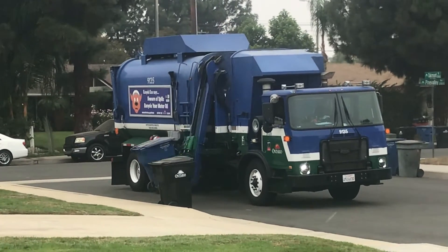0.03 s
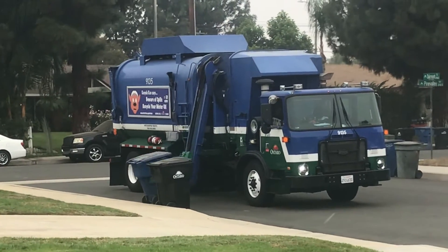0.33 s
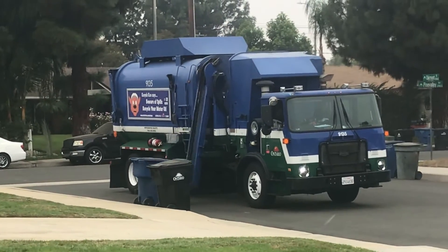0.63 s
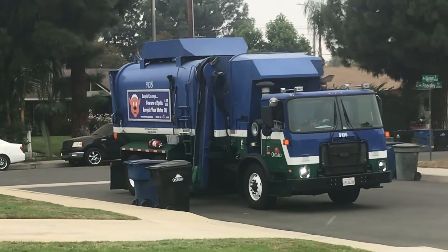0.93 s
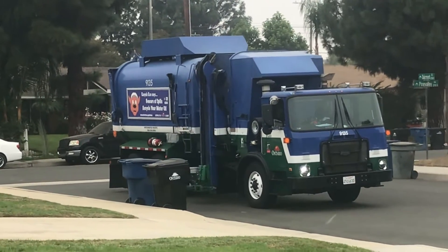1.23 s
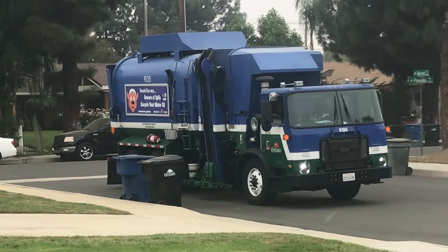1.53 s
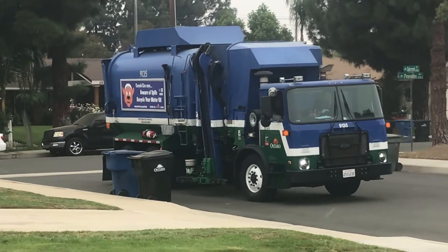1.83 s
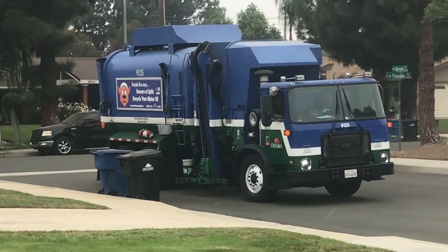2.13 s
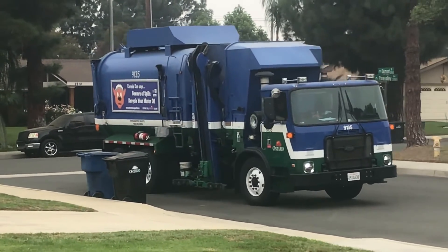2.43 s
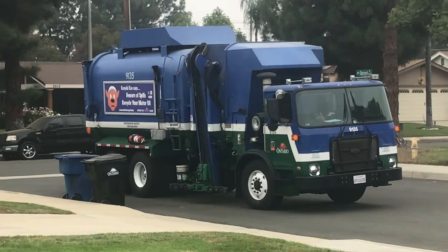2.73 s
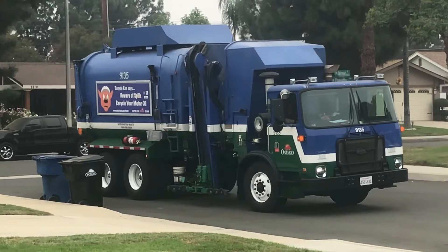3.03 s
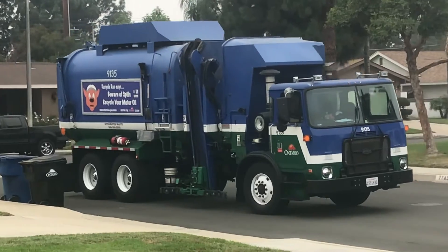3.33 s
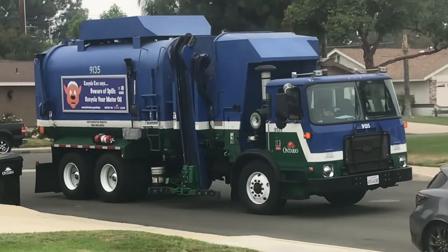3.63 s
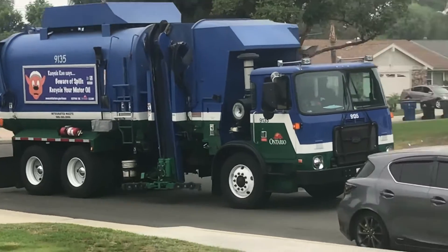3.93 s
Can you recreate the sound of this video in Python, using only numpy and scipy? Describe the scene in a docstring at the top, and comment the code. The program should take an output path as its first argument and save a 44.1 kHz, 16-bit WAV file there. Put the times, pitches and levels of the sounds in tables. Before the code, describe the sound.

A garbage truck's diesel engine rumbles under hissing hydraulics, plastic bin thumps and rattling metal clanks that echo slightly off houses. After a brief squeak, the engine grows louder and higher as the truck drives off with a faint whine.

```python
"""A diesel refuse truck idles in a suburban street, then revs up and pulls away. Periodic firing
drives the exhaust tones and roar and knocks on the engine block; gears whine, a turbo whistles.
Before it leaves, turbulent oil hisses in the hydraulic valves as the arm sets a hollow plastic bin
down with a few thumps. Impacts excite the modes of the steel arm, which clanks back and rattles
into its rest. The house fronts reflect the hard sounds."""
import sys
import numpy as np
from scipy import signal
from scipy.fft import rfft, irfft, next_fast_len
from scipy.io import wavfile
from scipy.ndimage import map_coordinates

SR = 44100
rng = np.random.default_rng(int(sys.argv[2]) if len(sys.argv) > 2 else 0)


def transcribe(signal):
    """Save signal, clipped to [-1, 1], as a 16-bit WAV file at the path in sys.argv[1]."""
    frames = np.atleast_2d(signal).T
    limited = np.clip(frames, -1, 1)
    pcm = np.round(limited * 32767).astype(np.int16)
    wavfile.write(sys.argv[1], SR, pcm)


N = 176400
T = np.arange(N) / SR

# Engine speed. Each row: time in seconds, firings per second.
FIRING_RATE = [(0, 34.6), (.294, 36.3), (.648, 41.6), (.93, 34), (1.1, 41), (1.2, 43.8), (1.46, 55),
               (1.83, 59), (2.05, 59), (2.18, 70), (2.28, 73.4), (2.38, 71.7), (2.59, 83.4), (3.05, 95),
               (3.47, 100.3), (3.77, 103.3), (4, 103)]
# Cylinders in firing order. Each entry: relative strength in dB.
CYLINDER_DB = [-2, -1.2, -1.2, -4, -1.2, 1.7]
# Exhaust tones at the firing rate and at twice that rate. Each row: time in seconds, level in dB.
FIRST_ORDER_LEVEL = [(0, -55), (1.05, -53), (1.2, -34), (1.23, -53), (1.28, -32.5), (1.43, -37.5),
                     (1.58, -32.5), (1.92, -32), (2.27, -26), (2.33, -36.5), (2.41, -22.5), (2.5, -31.5),
                     (2.55, -20.5), (2.62, -16), (2.74, -26.5), (2.77, -41), (2.83, -25), (3.93, -32.5),
                     (4, -29)]
SECOND_ORDER_LEVEL = [(0, -35), (.25, -38), (.38, -42), (.6, -37), (.8, -36), (.92, -42), (.99, -28.5),
                      (1.17, -28), (1.21, -41), (2.2, -46), (4, -43)]
# Weak exhaust tones. Each row: multiple of the firing rate, level in dB relative to the roar.
HALF_ORDERS = [(.5, -18), (1.5, -11.5), (2.5, -12.5), (3.5, -15.5), (4.5, -16)]
# Gear tones. Each row: multiple of the firing rate, level in dB relative to the knock.
GEAR_ORDERS = [(11.3, -9.5), (14.6, -16.5), (23.5, -20.5)]
# Turbo whistle. Each row: time in seconds, frequency in Hz, level in dB.
TURBO_WHISTLE = [(2.53, 10705, -70), (2.708, 11460, -60.5), (3.086, 12040, -60.5), (3.9, 11900, -63)]
# Envelopes of exhaust roar, combustion knock, fan and intake rush, high sizzle and valve hiss.
# Each row: time in seconds, level in dB.
ROAR_LEVEL = [(0, -46), (1.0, -42), (1.4, -39.5), (2.0, -37), (3.3, -29), (4.0, -30)]
KNOCK_LEVEL = [(0, -40.5), (.4, -45.5), (1.0, -43), (1.35, -44), (1.7, -41.5), (2.0, -39.3), (2.78, -31.5),
               (4.0, -28)]
RUSH_LEVEL = [(0, -62), (1.4, -50.5), (2.05, -38.5), (2.206, -43), (2.95, -36.5), (3.624, -34)]
SIZZLE_LEVEL = [(.6, -73), (1.0, -57), (1.4, -53.5), (1.7, -42), (2.1, -48.5), (2.5, -47), (2.9, -59)]
VALVE_LEVEL = [(0, -34.5), (.1, -36.5), (.4, -36.5), (.52, -37.5), (.66, -36), (.9, -35), (1.0, -41),
               (1.15, -42.5), (1.25, -51), (1.45, -56), (1.55, -37), (1.67, -37.5), (1.82, -32), (2.0, -45),
               (2.3, -81.5)]
# Spectral shapes of those noises and of the arm's crash. Each row: frequency in Hz, relative gain in dB.
ROAR_SPECTRUM = [(25, -30), (50, -6.5), (90, 8.5), (125, -1), (160, 3), (215, -6.5), (280, 0), (340, -3.5),
                 (400, -12.5), (460, -8), (750, -11), (2000, -51), (12000, -51)]
KNOCK_SPECTRUM = [(200, -26), (450, -5.5), (900, -2), (2400, -4), (4000, 7.5), (8000, -28), (12000, -46)]
RUSH_SPECTRUM = [(500, -3), (1500, -2), (2500, -8.5), (3300, -2.5), (4400, -3.5), (5700, -2.5),
                 (6500, -7.5), (7300, -17), (9300, -26), (10400, -36), (11300, -28), (12300, -35),
                 (13700, -78), (15500, -64)]
SIZZLE_SPECTRUM = [(3500, -38), (5000, 5), (5450, 7), (6100, 0.5), (6800, 5), (7300, -2.5), (7600, -15),
                   (8600, -11), (10300, -25), (11500, -24), (13500, -31)]
VALVE_SPECTRUM = [(200, -8.5), (480, -7), (800, 0.5), (1700, 2.5), (2850, -1.5), (3300, 4), (4000, 1),
                  (5700, 1), (7200, -13), (9500, -29), (10400, -32), (11500, -27), (14000, -37)]
CRASH_SPECTRUM = [(150, 5.5), (330, 2.5), (470, -5), (650, 6.5), (1000, -1.5), (1350, -3), (1700, -0.5),
                  (2900, 1), (3600, 2), (4800, -0.5), (5500, 0), (6400, -5), (7500, -16), (10300, -31.5),
                  (11500, -43), (14000, -58)]
# Resonances of the engine block, and of the arm's frame under oil flow.
# Each row: frequency in Hz, bandwidth in Hz, relative gain in dB.
BLOCK_RESONANCES = [(428, 58, -13), (612, 69, 0.5), (723, 111, -1.5), (1086, 111, 0.5), (1243, 150, -6),
                    (1475, 140, -8.5), (1795, 80, -5.5), (2170, 290, -12.5)]
FLOW_RESONANCES = [(622, 97, -4), (999, 49, -4.5), (1501, 18, -1.5), (1690, 35, -4.5), (2293, 53, -15)]
# Blows on the steel arm. Each row: start in seconds, level in dB, T60 of the crash in seconds,
# ring level in dB relative to the crash, frequency of the struck part in Hz.
ARM_BLOWS = [(.02, -42, .1, 11, 1015), (.553, -28.5, .18, -2, 1875), (.692, -20.5, 0.1, -0.5, 587),
             (.709, -26, 0.2, -4, 1070), (.727, -32.5, 0.72, 5.5, 1538), (.823, -21.5, 0.18, -2, 1530),
             (.837, -32, 0.25, 8, 1010), (.905, -32.5, 0.22, -2, 2260), (.996, -42, 0.16, 9.5, 1000),
             (1.104, -30, 0.081, -6.5, 907), (1.541, -28, 0.13, -13, 2580), (1.556, -38, 0.097, 10, 742),
             (1.584, -22.5, 0.12, -10, 2010), (1.623, -25, 0.078, -5.5, 5620), (1.692, -29, 0.57, -6, 3050),
             (1.724, -29.5, 0.46, 1, 811), (1.737, -38.5, .1, 12.5, 758), (1.764, -17, 0.097, -8.5, 724.5),
             (1.785, -40, .27, 11, 5530), (1.89, -32, .22, 0.5, 1510)]
# Bumps of the bin on the road. Each row: start in seconds, thump level in dB, thump frequency in Hz,
# level of the walls' ring in dB.
BIN_BUMPS = [(.421, -22.5, 112, -22.5), (.446, -28, 158, -23), (.554, -22, 93, -35), (0.626, -19, 86, -40),
             (0.831, -30, 312, -28)]
# Modes of the steel frame and bin walls. Each row: frequency in Hz, relative level in dB, T60 in seconds.
FRAME_MODES = [(316.6, -7.5, 0.13), (551, -7, 0.27), (590, 1.5, 0.15), (717.5, 1, 0.19), (922, -2.5, 0.19),
               (1036.5, 8.5, 0.07), (1230, -9, .29), (1541, 2.5, 0.11), (1742, -4.5, 0.27),
               (2070, -5, 0.21), (2290, 1, 0.15), (3320, -2, 0.1), (3970, -7, 0.13), (5350, -1, .45),
               (5760, -11, 0.22)]
BIN_MODES = [(161, -11, 0.075), (272, -3.5, 0.09), (615, 4, 0.082), (682, -2, 0.099), (946, -6, 0.14),
             (1457, -14, 0.17), (1740, -4, 0.1)]


def exhaust(firing_hz, cycle):
    """Periodic gas pulses give engine orders and a puffing roar; order 3 swells at a pipe resonance."""
    pipe_hz, half_width_hz, pipe_db = 293.3, 20.6, -3.5
    first = amp(curve(FIRST_ORDER_LEVEL)) * order_tone(cycle, order=1, rough=0.027)
    second = amp(curve(SECOND_ORDER_LEVEL)) * order_tone(cycle, order=2, rough=0.2)
    pipe_gain = amp(pipe_db) / np.hypot(1, (3 * firing_hz - pipe_hz) / half_width_hz)
    third = pipe_gain * order_tone(cycle, order=3, rough=0.25)
    halves = sum(amp(db) * order_tone(cycle, order, rough=0.94) for order, db in HALF_ORDERS)
    puffs = coloured(noise() * firing_gate(cycle, decay_periods=0.4, bed=0.92), ROAR_SPECTRUM)
    return first + second + amp(curve(ROAR_LEVEL)) * (third + halves + puffs)


def knock(cycle):
    """Impulsive excitation: each cylinder repeats its own rap on the resonant block, over random clatter."""
    rap_t60, raps_db = 0.03, -7
    firings = np.flatnonzero(np.diff(cycle.astype(int)))
    raps, t = np.zeros(N), T[:SR // 20]
    for k, db in enumerate(CYLINDER_DB):
        impulses = amp(db) * np.bincount(firings[k::len(CYLINDER_DB)], minlength=N)
        rap = rng.standard_normal(len(t)) * np.exp(-np.log(1000) * t / rap_t60)
        raps += signal.fftconvolve(impulses, rap)[:N]
    clatter = noise() * firing_gate(cycle, decay_periods=0.7, bed=0.78)
    block = resonate(clatter + amp(raps_db) * unit(raps), BLOCK_RESONANCES)
    return amp(curve(KNOCK_LEVEL) + 0.57 * wobble(14)) * coloured(block, KNOCK_SPECTRUM)


def steel_arm():
    """Each impact gives a crash of loose links and excites frame modes, most near the struck part's pitch."""
    fall_db_per_octave, part_t60 = 2, 0.12
    crash_power, ring = np.zeros(N), np.zeros(N)
    for start, db, t60, ring_db, part_hz in ARM_BLOWS:
        crash_power += (amp(db) * blow(start, attack=0.0022, t60=t60)) ** 2
        frame_modes = [(hz, level - fall_db_per_octave * abs(np.log2(hz / part_hz)), mode_t60)
                       for hz, level, mode_t60 in FRAME_MODES]
        part_modes = [(part_hz, 0, part_t60), (1.22 * part_hz, -9.5, part_t60)]
        clonk = strike(start, part_modes, attack=0.0025)
        ring += amp(db + ring_db) * (strike(start, frame_modes, attack=0.0049) + clonk)
    chatter = unit(amp(0.5 * wobble(270)))
    return np.sqrt(crash_power) * coloured(noise() * chatter, CRASH_SPECTRUM) + ring


def plastic_bin():
    """Damped oscillation: at each bump the air in the empty bin thumps and its soft walls ring."""
    rise_s = 0.0097
    out = np.zeros(N)
    for start, db, hz, wall_db in BIN_BUMPS:
        age = np.maximum(T - start, 0) / rise_s
        thump = amp(db) * age * np.exp(1 - age) * np.sin(2 * np.pi * hz * (T - start))
        out += thump + amp(wall_db) * strike(start, BIN_MODES, attack=0.0024)
    return out


def hydraulics():
    """Turbulent oil hisses in the valves and drives frame resonances; ticking links modulate both."""
    tick_hz, tick_db, decay_periods, ring_db = 26, -4, 0.16, -4
    ring = resonate(noise() * amp(3.1 * wobble(150)), FLOW_RESONANCES)
    tick_count = np.cumsum(tick_hz * amp(3.5 * wobble(tick_hz))) / SR  # unevenly spaced
    ticks = unit(1 + amp(tick_db) * np.exp(-(tick_count % 1) / decay_periods))
    hiss = coloured(noise(), VALVE_SPECTRUM)
    return amp(curve(VALVE_LEVEL)) * ticks * (hiss + amp(ring_db) * ring)


def gears(cycle):
    """Meshing teeth whine at constant multiples of the engine speed, fading in as the truck pulls away."""
    start_s, rise_s = 2.5, 0.79
    load = amp(curve(KNOCK_LEVEL)) * np.clip((T - start_s) / rise_s, 0, 1)
    return load * sum(amp(db) * order_tone(cycle, order, rough=0.5) for order, db in GEAR_ORDERS)


def fan_and_intake(cycle):
    """Turbulent air gives a broadband rush, weakly pulsed by the firing; a thin sizzle lies above it."""
    flow = noise() * firing_gate(cycle, decay_periods=0.3, bed=8.4)
    rush = amp(curve(RUSH_LEVEL)) * coloured(flow, RUSH_SPECTRUM)
    sizzle = amp(curve(SIZZLE_LEVEL)) * coloured(noise(), SIZZLE_SPECTRUM)
    return rush + sizzle


def turbo():
    """The spinning turbo whistles; random modulation and a noise band just below make the tone breathy."""
    jitter_hz, spread_hz, breath_db, fade_s = 70, 360, -5, 0.11
    phase = 2 * np.pi * np.cumsum(curve(TURBO_WHISTLE) + jitter_hz * wobble(500)) / SR
    breath = unit(wobble(2 * spread_hz) * np.sin(phase - 2 * np.pi * spread_hz * T + wobble(300)))
    tone = amp(1.795 * wobble(60)) * np.sin(phase + 0.9 * wobble(350))
    fade_in = np.clip((T - TURBO_WHISTLE[0][0]) / fade_s + 1, 0, 1)
    return fade_in * amp(curve(TURBO_WHISTLE, column=2)) * (tone + amp(breath_db) * breath)


def squeak():
    """A short falling glide, roughened by phase modulation, sounds as the truck starts to roll."""
    start_s, length_s, top_hz, fall_hz, level_db = 2.075, 0.07, 6850, 1550, -44
    progress = np.clip((T - start_s) / length_s, 0, 1)
    phase = 2 * np.pi * np.cumsum(top_hz - fall_hz * progress) / SR
    envelope = np.sqrt(abs(np.sin(np.pi * progress)))
    return amp(level_db) * envelope * np.sin(phase + 1.22 * wobble(560))


def street(x):
    """Reflection from the house fronts: convolution with a delayed, decaying tail of noise."""
    tail = coloured(noise(), [(100, -3), (400, -6.5), (5000, -22.5), (12000, -4.5)])
    tail *= blow(start=0.033, attack=0.0046, t60=0.29)
    return signal.fftconvolve(x, tail / np.linalg.norm(tail))[:N]


def firing_gate(cycle, decay_periods, bed):
    """Amplitude modulation: a burst per firing, at its cylinder's strength, over a steady bed."""
    strength = amp(np.array(CYLINDER_DB)[cycle.astype(int) % len(CYLINDER_DB)])
    return unit(bed + strength * np.exp(-(cycle % 1) / decay_periods))


def order_tone(cycle, order, rough):
    """An engine order: a sinusoid at a multiple of the firing rate, unsteady in level and phase."""
    return np.sqrt(2) * (1 + rough * wobble(35)) * np.sin(2 * np.pi * order * cycle + rough * wobble(25))


def strike(start, modes, attack):
    """Modal superposition: damped sinusoids ring from one blow and jangle as their phases wander."""
    scatter_db, jangle_rad, steps_per_s = 2.14, 0.68, 108
    t, out = T[:SR // 2], np.zeros(N + SR)
    hz, db, t60 = np.transpose(modes)[:, :, None]
    size = amp(db + scatter_db * rng.standard_normal(hz.shape))
    walks = np.cumsum(rng.standard_normal((len(hz), 400)), axis=1)
    wander = np.array([map_coordinates(walk, [t * steps_per_s], mode="nearest") for walk in walks])
    drift = jangle_rad * np.sqrt(hz / 1000) * wander  # higher modes drift further
    envelopes = size / np.linalg.norm(size) * np.exp(-np.log(1000) * t / t60)
    ring = (envelopes * np.sin(2 * np.pi * hz * t + drift)).sum(0)
    out[round(start * SR):][:len(t)] = np.sqrt(2) * ring * (1 - np.exp(-t / attack))
    return out[:N]


def blow(start, attack, t60):
    """Exponential rise and decay of one blow; all times in seconds."""
    t = np.maximum(T - start, 0)
    return (1 - np.exp(-t / attack)) * np.exp(-np.log(1000) * t / t60)


def resonate(x, resonances):
    """Forced response of parallel resonators of alternating sign, at rms 1."""
    def response(f):
        return sum((-1) ** k * amp(db) * 1j * f * width / (hz * hz - f * f + 1j * f * width)
                   for k, (hz, width, db) in enumerate(resonances))
    return unit(filtered(x, response))


def coloured(x, points):
    """Spectral shaping by (Hz, dB) points, at rms 1."""
    hz, db = np.transpose(sorted(points))
    return unit(filtered(x, lambda f: amp(np.interp(np.log(f + 1), np.log(hz + 1), db))))


def filtered(x, response):
    """Linear filtering: the spectrum of x times a frequency response."""
    size = next_fast_len(N + SR // 2)
    return irfft(rfft(x, size) * response(np.fft.rfftfreq(size, 1 / SR)), size)[:N]


def curve(rows, column=1):
    """Linear interpolation of one column of a time table, a value per sample."""
    rows = np.array(rows)
    return np.interp(T, rows[:, 0], rows[:, column])


def wobble(rate):
    """A smooth random curve with rate knots per second."""
    return map_coordinates(rng.standard_normal(8000), [T * rate], mode="wrap")


def noise():
    """White noise."""
    return rng.standard_normal(N)


def amp(db):
    """Decibels to amplitude gain."""
    return 10 ** (np.asarray(db) / 20)


def unit(x):
    """Normalisation to rms 1."""
    return x / np.sqrt(np.mean(x ** 2) + 1e-20)


def scene():
    """Superposition of engine, arm and bin; only the hard, mechanical sounds are reflected."""
    street_db = -8
    firing_hz = curve(FIRING_RATE)
    cycle = np.cumsum(firing_hz) / SR  # firings elapsed
    hard = knock(cycle) + gears(cycle) + steel_arm() + plastic_bin() + squeak()
    flow = exhaust(firing_hz, cycle) + fan_and_intake(cycle) + turbo() + hydraulics()
    return (flow + hard + amp(street_db) * street(hard))[None]


def record(dry):
    """Band limiting: the deepest bass rolls off and the highest treble is cut."""
    low_hz, top_hz = 33, 15750
    return filtered(dry[0], lambda f: (f < top_hz) * (1 - 1 / (1 + (f / low_hz) ** 6)))[None]


dry = scene()
out = record(dry)
transcribe(out)
```